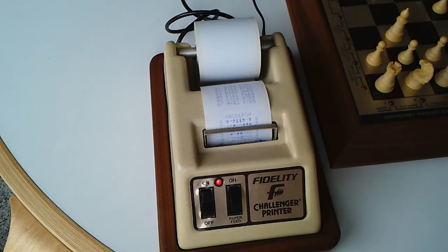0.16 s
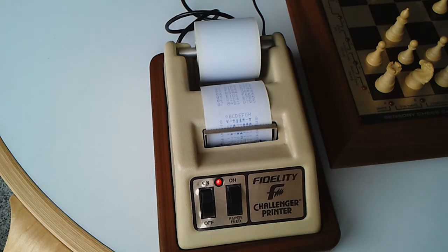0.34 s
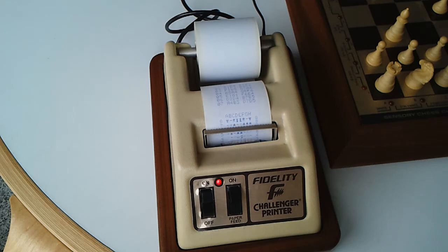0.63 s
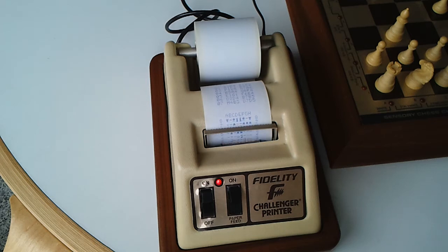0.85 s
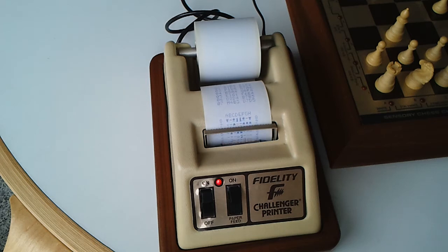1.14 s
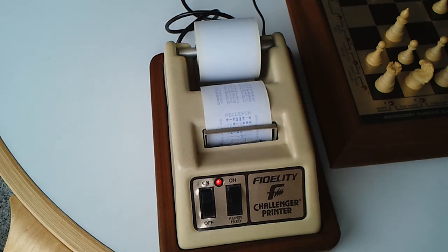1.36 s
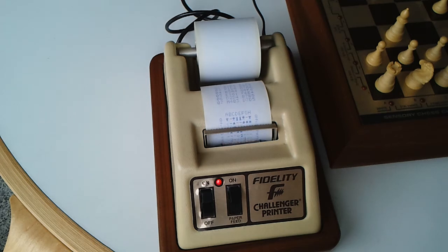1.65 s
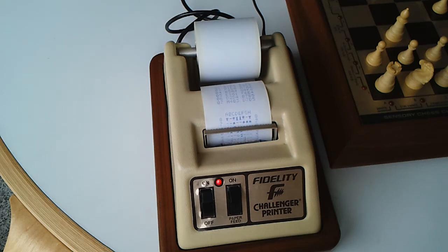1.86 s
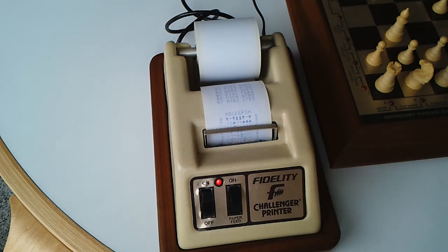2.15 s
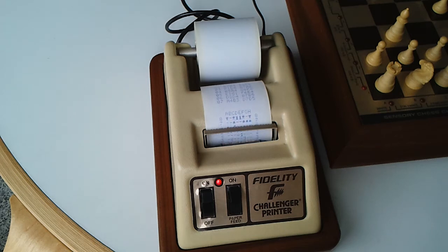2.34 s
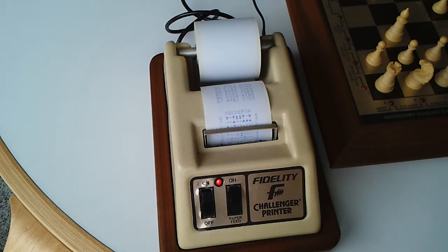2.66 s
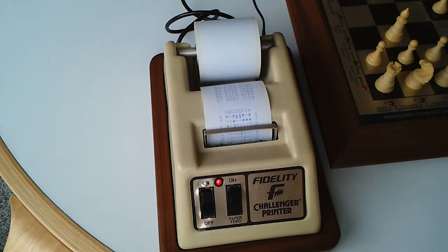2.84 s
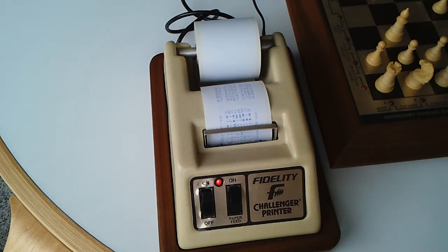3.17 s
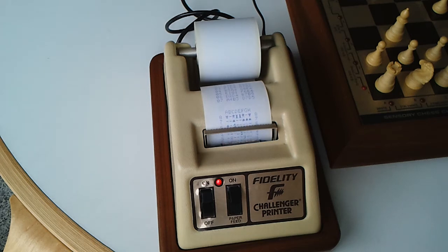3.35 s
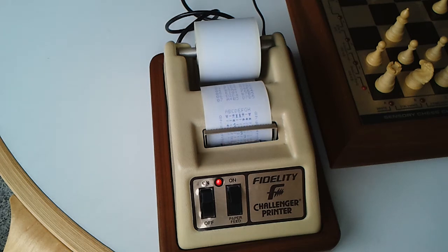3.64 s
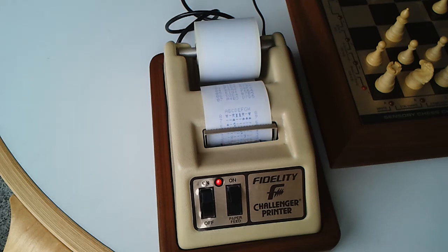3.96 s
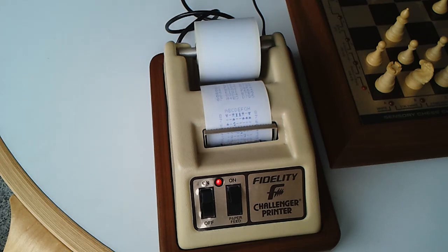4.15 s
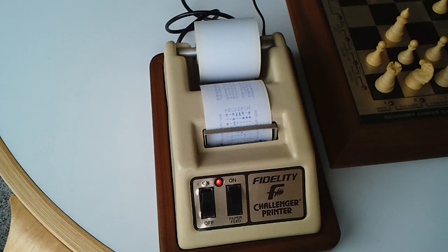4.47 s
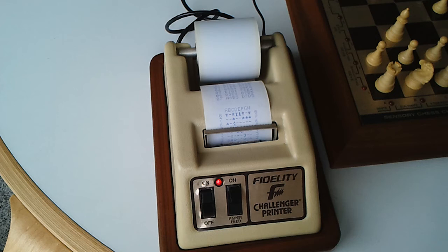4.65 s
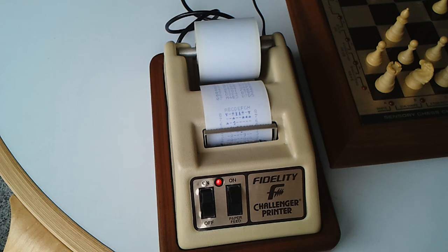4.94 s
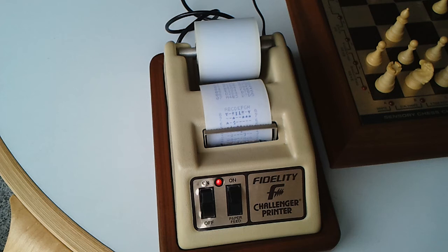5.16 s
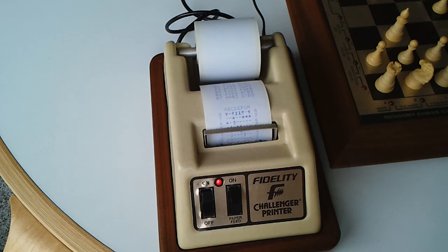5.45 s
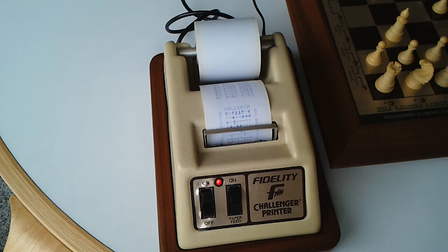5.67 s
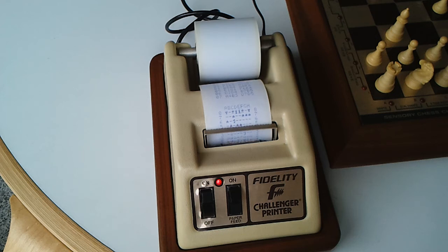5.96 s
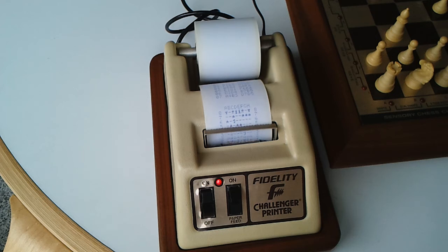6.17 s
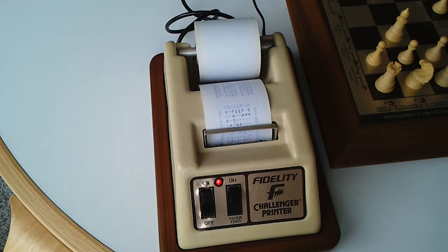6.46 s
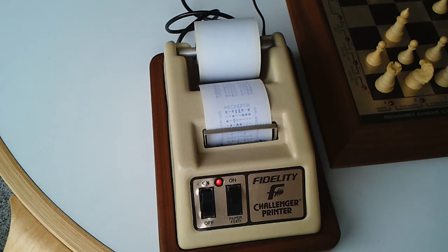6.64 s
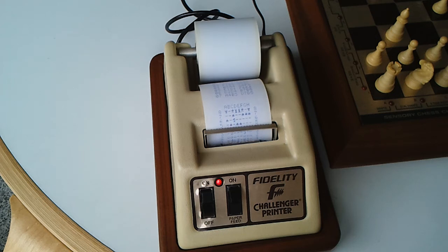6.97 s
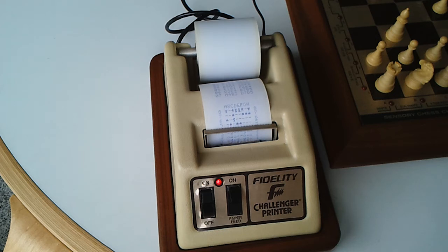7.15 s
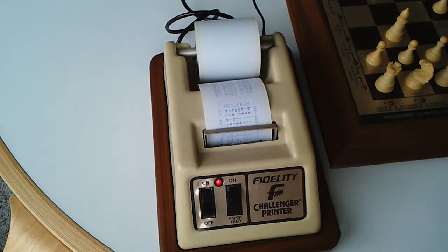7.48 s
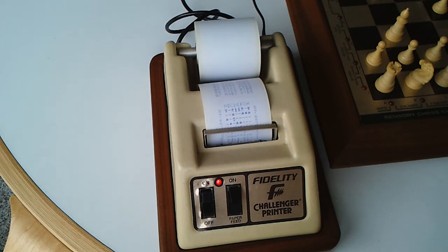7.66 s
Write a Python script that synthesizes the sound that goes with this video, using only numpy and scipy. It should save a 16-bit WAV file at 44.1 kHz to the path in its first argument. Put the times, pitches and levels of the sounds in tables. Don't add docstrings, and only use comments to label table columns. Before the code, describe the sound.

Hard, close clicks from a hollow plastic printer come in steady runs, broken by short gaps, over very faint ventilation and hiss.

```python
import sys
import numpy as np
from scipy import signal
from scipy.fft import next_fast_len
from scipy.io import wavfile

SR = 44100
rng = np.random.default_rng(int(sys.argv[2]) if len(sys.argv) > 2 else 0)


def to_wav(sig):
    pcm = np.clip(np.atleast_2d(sig), -1, 1) * 32767
    pcm = np.round(pcm).astype(np.int16)
    wavfile.write(sys.argv[1], SR, pcm.T)


def volts_from_decibels(level):
    exponent = np.asarray(level, float) / 20
    return 10 ** exponent


N = 344414


def moves():
    # (time [s], click peak [dB], case thump, wall ring, 4 kHz bite [dB re click])
    steps = [(0.0473, -26.5, -16.5, -19.5, -18), (0.6394, -27.5, -24, -31, -11.5),
             (0.9855, -28.5, -13, -19, -18), (1.331, -25.5, -16.5, -19, -17.5),
             (1.707, -17.5, -22.5, -25, -20), (2.051, -21.5, -23, -19, -15.5),
             (2.3974, -17.5, -20.5, -21, -15.5), (2.6485, -25, -18, -26, -9),
             (3.8692, -23.5, -27.5, -23.5, -8.5), (4.215, -20.5, -25, -18, -18),
             (4.592, -16.5, -22, -21, -14), (4.9345, -22, -21, -24.5, -17),
             (5.2778, -24, -18.5, -24, -14.5), (5.6225, -22, -24, -19, -8.5),
             (5.8902, -16.5, -51, -25, -14.5), (6.5393, -16, -26, -31, -12),
             (6.8521, -18.5, -34.5, -27.5, -12.5), (7.1656, -22, -23, -29, -13.5),
             (7.4786, -21, -18.5, -31, -10.5), (7.7913, -21.5, -25.5, -29, -17.5)]
    # (time [s], peak [dB], case thump, wall ring, 4 kHz bite [dB re peak])
    seatings = [
        (0.1144, -36, -7, -11, -14),
        (2.873, -34, -8.5, -14, -22),
        (2.9379, -33.5, -7, -20, -13.5),
        (3.5232, -32.5, -9.5, -12.5, -13.5),
        (5.957, -34, -9, -18, -18),
    ]
    rows = sorted([(*row, 1) for row in steps] + [(*row, 0) for row in seatings])
    s, db, thump_db, ring_db, bite_db, hard = np.transpose(rows)
    force_db = db + 21
    extra_bite_db = bite_db + 14
    body_db = np.where(hard, -15.5 - 0.35 * force_db, -16.5)
    tail_db = np.where(hard, 1.1 - 0.29 * force_db, 3)
    knock_db = np.where(hard, np.minimum(-14.5 + 2.2 * force_db, -19.5), -25)
    edge_db = np.where(hard, -14.5 - 0.4 * extra_bite_db + 0.29 * force_db, -20.5)
    return np.transpose([s, db, thump_db, ring_db, body_db, tail_db,
                         db + knock_db, db + bite_db, db + edge_db, hard])


def contacts():
    # (time [s], peak [dB])
    slack_ticks = [(.131, -47), (0.631, -47.5), (2.391, -38), (3.549, -40), (3.866, -45), (4.208, -39),
                   (4.584, -35), (4.93, -33), (5.272, -45), (5.616, -36), (7.161, -34), (7.471, -40.5),
                   (7.784, -38)]
    # (delay [s], level [dB])
    echoes = [(.0007, 6), (.0013, 1), (.0045, -25.5), (.0082, -13), (.0170, -22), (0.025, -20.5)]
    # (frequency [Hz], width [Hz], level [dB])
    click_peaks = [(2090, 430, -4.5), (3010, 555, 0), (4170, 395, 2.5), (5960, 1300, 1), (6770, 210, -2.5)]
    slack = [(s, db, -14, db - 14.5, db - 16, 1) for s, db in slack_ticks]
    s, db, body_db, bite_db, edge_db, hard = np.vstack([moves()[:, [0, 1, 4, 7, 8, 9]], slack]).T

    blow = s + 0.0004
    times, sizes = [blow], [hard]
    for delay, level_db in echoes:
        chance = rng.standard_normal((2, len(s)))
        times.append(blow + delay * (1 + 0.018 * chance[0]))
        sizes.append(hard * volts_from_decibels(level_db + 1.1 * chance[1]))

    before, after, during = rng.random((3, 30, len(s)))
    approach, chatter, seating = rng.standard_normal((3, 30, len(s)))
    times += [*(s - 0.0064 * before)]
    sizes += [*(hard * volts_from_decibels(-29 - 20 * before) * approach)]
    times += [*(s + 0.002 + 0.05 * after ** 1.5)]
    sizes += [*(volts_from_decibels(-23 - 5.5 * after + 6.6 * (2 - hard)) * chatter)]
    times += [*(s - 0.0015 + 0.0033 * during)]
    sizes += [*((1 - hard) * volts_from_decibels(-6.5) * seating)]
    times, sizes = np.maximum(times, 0), np.array(sizes)

    levels = [db + body_db + 17.5, db + body_db + 14.5, bite_db + 14.5, edge_db + 13.5, edge_db + 12]
    out = 0
    for k, (hz, width_hz, gain_db) in enumerate(click_peaks):
        clicks = train(times, sizes * volts_from_decibels(levels[k] + gain_db))
        out = out + (-1) ** k * resonance(clicks, hz, width_hz)
    return volts_from_decibels(10.5) * out


def struck_modes(modes, strength_db, delay_s, spread_db):
    s, out = moves()[:, 0], 0
    for k, (hz, db, t60) in enumerate(modes):
        strength = strength_db + db + spread_db * rng.standard_normal(len(s))
        out = out + (-1) ** k * ring(train(s + delay_s, volts_from_decibels(strength)), hz, t60)
    return out


def head_carrier():
    # (frequency [Hz], level [dB], t60 [s])
    carrier_modes = [(1286, -5.5, 0.072), (1433, 1, 0.044), (1590, -12, 0.049), (1250, -10.5, 0.03)]
    knock_db = moves()[:, 6]
    return struck_modes(carrier_modes, knock_db - 1.5, delay_s=0.00039, spread_db=2.5)


def metal_frame():
    # (frequency [Hz], level [dB], t60 [s])
    frame_modes = [(1871, 0.5, 0.014), (2116, -11, 0.045), (2620, -13.5, 0.031), (2940, -7.5, 0.037),
                   (4134, 4, 0.016), (4420, -5, 0.046), (4660, -1.5, 0.046), (5420, -4.5, 0.037),
                   (6300, -13.5, 0.036)]
    rows = moves()
    return struck_modes(frame_modes, rows[:, 1] + rows[:, 5] - 30.5, delay_s=0.000811, spread_db=5.5)


def case_walls():
    # (frequency [Hz], level [dB], t60 [s])
    wall_modes = [(1073, -1.5, 0.084), (1004, -1.5, 0.078), (842, -8, 0.043), (640, -14, 0.012)]
    rows = moves()
    return struck_modes(wall_modes, rows[:, 1] + rows[:, 3] + 1.0, delay_s=0.00056, spread_db=3.0)


def case_cavity():
    # (frequency [Hz], level [dB], t60 [s])
    cavity_modes = [(481, -15, 0.5), (507, -15.5, 0.05), (420, -19, 0.46), (387, -11.5, 0.082),
                    (327.3, -7.5, 0.11)]
    rows = moves()
    return struck_modes(cavity_modes, rows[:, 1] + rows[:, 2] + 1.0, delay_s=0.002, spread_db=4.0)


def rotor_buzz():
    out, age = np.zeros(N + SR), np.arange(SR // 8) / SR
    for s, db, thump_db in moves()[:, :3]:
        hz = 495.5 + 6.7 * rng.standard_normal()
        current_stops = 8 / hz
        stilled = np.where(age < current_stops, 1, 0.28 * volts_from_decibels(-200 * (age - current_stops)))
        level = volts_from_decibels(db + thump_db + 2.0 - 60 * age / 0.3)
        at = int((s + 0.0023) * SR)
        out[at:at + len(age)] += level * stilled * np.sin(2 * np.pi * hz * age)
    return resonance(out[:N], 490, 230)


def room_and_air():
    # (frequency [Hz], level [dB per Hz])
    tail_colour = [(60, -23), (220, -12.5), (480, 2.5), (800, -4), (1300, -3.5), (2100, -4), (3100, -6.5),
                   (4300, -2.5), (6000, -13.5)]
    # (frequency [Hz], late t60 [s], early t60 [s])
    tail_t60 = [(250, 1, 0.077), (488, 0.33, 0.12), (1230, 0.31, 0.11), (3000, 0.39, 0.066),
                (6500, 0.51, 0.15)]
    # (frequency [Hz], level [dB per Hz])
    vent_colour = [(25, -33), (42, -17.5), (50, -6), (62, -16), (120, -3.5), (200, -3.5), (250, -0.5),
                   (430, -1), (620, -5.5), (1010, -1.5), (1200, -6.5), (1500, -5.5), (2400, -11),
                   (5000, -28.5)]
    # (time [s], level [dB])
    airflow = [
        (0.0, -61.5),
        (0.15, -63.5),
        (3.63, -61),
        (5.05, -64),
        (5.59, -62.5),
        (7.81, -68.5),
    ]
    # (frequency [Hz], level [dB per Hz])
    hiss_colour = [(30, -13), (300, 1), (2400, -1.5), (4500, -2), (7000, -7)]
    hiss_db = -66
    rows = moves()
    vent = volts_from_decibels(np.interp(np.arange(N) / SR, *np.transpose(airflow)) - 1.97)
    power = train(rows[:, 0] + 0.0021, volts_from_decibels(2 * (rows[:, 1] + rows[:, 5])))
    out = 0
    for hz, band in noise_bands():
        late, early = (volts_from_decibels(-120 / (at_hz(tail_t60, hz, axis=a) * SR)) for a in (1, 2))
        tail = volts_from_decibels(-34.0) * signal.lfilter([1], [1, -late], power)
        tail = tail + volts_from_decibels(-29.5) * signal.lfilter([1], [1, -early], power)
        air = (vent * volts_from_decibels(at_hz(vent_colour, hz) + 17.0)) ** 2
        hiss = volts_from_decibels(2 * (hiss_db + 8 + at_hz(hiss_colour, hz)))
        out = out + band * np.sqrt(air + hiss + tail * volts_from_decibels(2 * at_hz(tail_colour, hz)))
    return out


def duct_drones():
    # (frequency [Hz], width [Hz])
    drones = [(248, 6.3), (268.1, 12), (216.2, 12)]
    # (middle [s], length [s], level [dB])
    low_swells = [(2.72, .4, -66), (3.25, .5, -67), (3.85, .15, -70), (4.18, .18, -66)]
    # (middle [s], length [s], level [dB])
    high_swells = [(2.48, .15, -62), (2.97, .3, -67), (6.42, .3, -69), (6.97, .18, -62), (7.58, .22, -66)]
    # (middle [s], length [s], level [dB])
    deep_swells = [(.3, .4, -73), (1.55, .45, -70), (2.1, .3, -71)]
    out = 0
    for rows, (hz, width_hz) in zip([low_swells, high_swells, deep_swells], drones):
        narrow = resonance(resonance(rng.standard_normal(N), hz, width_hz), hz, width_hz)
        envelope = np.abs(signal.hilbert(rms_one(narrow), next_fast_len(N))[:N])
        even = narrow / (envelope + 0.85)
        out = out + swells(rows) * rms_one(even)
    return out


def swells(rows):
    t = np.arange(N) / SR
    out = np.full(N, volts_from_decibels(-82.5))
    for middle, length, db in rows:
        out += volts_from_decibels(db) * np.exp(-(2 * (t - middle) / length) ** 2)
    return out


def noise_bands():
    edges = 25 * 2 ** np.arange(0, 8.6, 0.5)
    white = rng.standard_normal((2, N))
    for k, (low, high) in enumerate(zip(edges, edges[1:])):
        sos = signal.butter(2, [low, high], "band", fs=SR, output="sos")
        yield np.sqrt(low * high), signal.sosfilt(sos, white[k % 2])


def rms_one(x):
    return x / np.sqrt(np.mean(x ** 2) + 1e-20)


def at_hz(points, hz, axis=1):
    points = np.array(points)
    return np.interp(np.log(hz), np.log(points[:, 0]), points[:, axis])


def resonance(x, hz, width_hz):
    r = np.exp(-np.pi * width_hz / SR)
    poles = [1, -2 * r * np.cos(2 * np.pi * hz / SR), r * r]
    return signal.lfilter([(1 - r * r) / 2, 0, (r * r - 1) / 2], poles, x + 1e-18)


def ring(clicks, hz, t60):
    r, w = volts_from_decibels(-60 / (t60 * SR)), 2 * np.pi * hz / SR
    return signal.lfilter([0, np.sin(w)], [1, -2 * r * np.cos(w), r * r], clicks + 1e-18)


def train(times, gains):
    out = np.zeros(N + SR)
    np.add.at(out, np.round(np.asarray(times) * SR).astype(int), gains)
    return out[:N]


def scene():
    printer = contacts() + head_carrier() + metal_frame() + case_walls() + case_cavity() + rotor_buzz()
    no_bass = signal.butter(3, 240, "high", fs=SR, output="sos")
    mono = signal.sosfilt(no_bass, printer) + room_and_air() + duct_drones()
    return np.tile(mono, (2, 1))


def dropouts(x):
    hz, s, frames = signal.stft(x, SR, nperseg=768)
    starts = np.add.outer(moves()[:, 0], [-0.038, 0.028]).ravel()
    chance = rng.random((len(starts), 11, 3))
    keep = np.ones(frames.shape[1:])
    for start, holes in zip(starts, chance):
        for place, width, shift in holes:
            low_hz, begin = 1700 + 5300 * place, start + 0.024 * shift
            in_band = (hz > low_hz) & (hz < low_hz + 170 + 500 * width ** 4)
            in_time = (s > begin) & (s < begin + 0.018)
            keep[np.ix_(in_band, in_time)] = 0.02
    return signal.istft(frames * keep, SR, nperseg=768)[1][:, :N]


def low_pass(x):
    return signal.sosfilt(signal.butter(12, 7900, fs=SR, output="sos"), x)


def record(dry):
    steep = signal.ellip(12, 0.5, 72, 6950, fs=SR, output="sos")
    cut = signal.sosfilt(steep, dropouts(dry))
    converter = volts_from_decibels(-100) * rng.standard_normal(N) + volts_from_decibels(-104) * rng.standard_normal(dry.shape)
    return low_pass(cut + converter)


dry = scene()
out = record(dry)
to_wav(out)
```